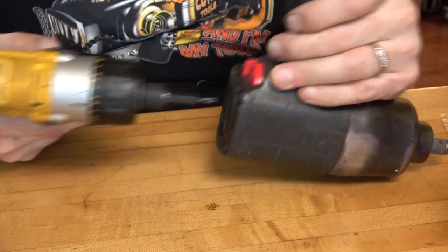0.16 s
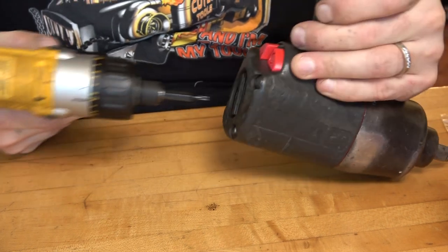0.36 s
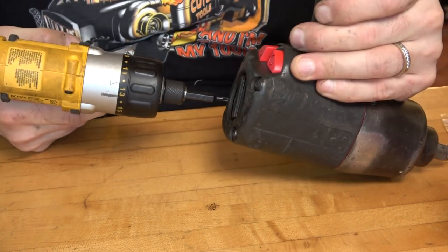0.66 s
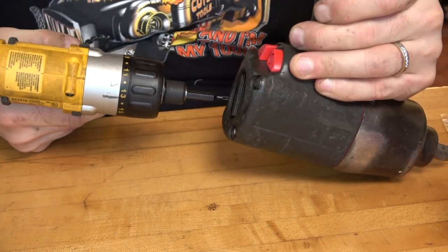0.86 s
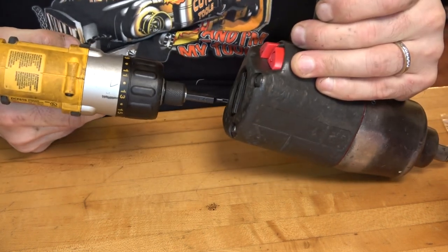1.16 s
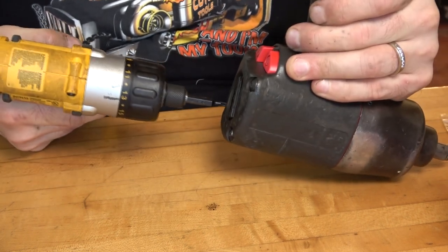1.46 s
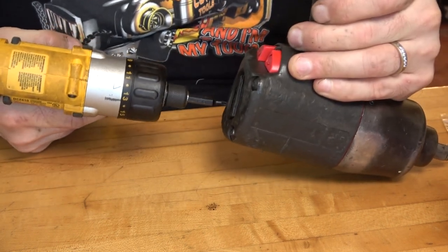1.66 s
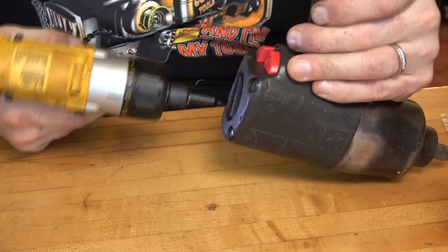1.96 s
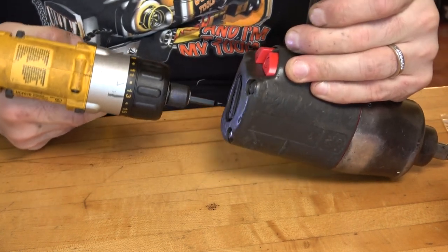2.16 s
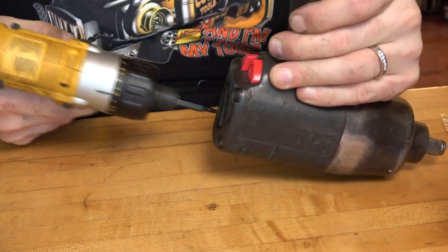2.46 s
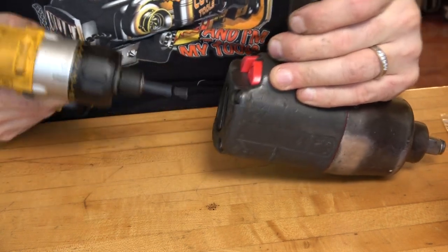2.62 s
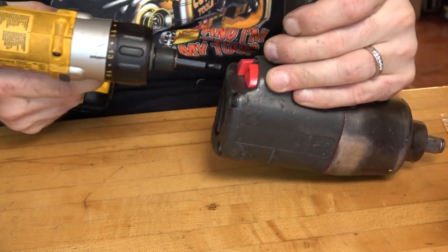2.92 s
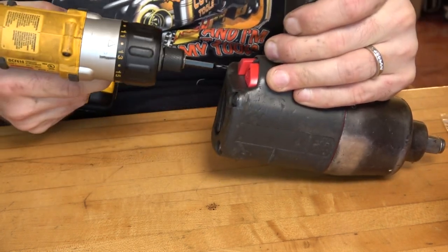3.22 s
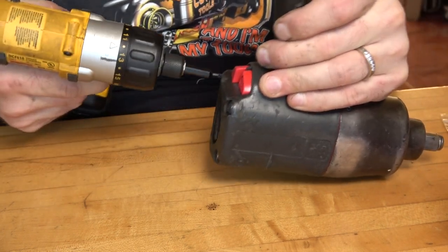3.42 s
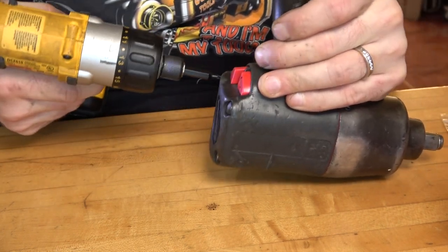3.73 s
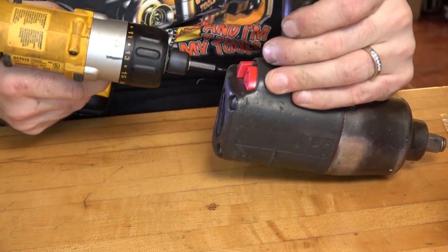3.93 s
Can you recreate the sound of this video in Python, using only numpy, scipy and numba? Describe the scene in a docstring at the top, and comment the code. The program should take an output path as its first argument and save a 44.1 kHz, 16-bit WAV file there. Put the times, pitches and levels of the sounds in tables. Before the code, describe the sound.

A cordless drill's clutch ratchets loudly in three short bursts, with light bit ticks and soft housing knocks on a wooden bench between them.

```python
"""Cordless drill driver on a workbench

A drill driver tightens screws into a tool housing on a wooden bench, heard from close by. Filtered noise makes
the gear rush, sines make the motor hum and the switch whistle, and short rattles of force ring steel, plastic
and wood: the clutch ratchets in three bursts, and between them the bit ticks on screw heads and the housing
knocks and scuffs the bench. A small workshop answers with fading noise, and a limiter ducks the loud clutch."""
import sys
import numpy as np
from scipy import signal
from scipy.fft import rfft, irfft, next_fast_len
from scipy.io import wavfile
from scipy.ndimage import uniform_filter1d, minimum_filter1d
from numba import njit

SR = 44100
rng = np.random.default_rng(int(sys.argv[2]) if len(sys.argv) > 2 else 0)


def dump_mix(stems):
    """Bounce the given channels to the path in sys.argv[1] as a 16-bit WAV at rate SR."""
    frames = np.atleast_2d(stems).T  # one column per channel
    limited = np.clip(frames, -1, 1)  # hard clip at full scale
    pcm = np.round(limited * 32767).astype(np.int16)
    wavfile.write(sys.argv[1], SR, pcm)


N = 180148  # length in samples


def amp(db):
    """Turn dB into gain."""
    return 10 ** (np.asarray(db) / 20)


def unit(x):
    """Scale x to an rms of 1."""
    return x / np.sqrt(np.mean(x ** 2) + 1e-20)


def along(points, hz):
    """Read a (frequency, value) curve, with straight lines on a log frequency axis."""
    f, v = np.transpose(points)
    return np.interp(np.log(hz + 1), np.log(f + 1), v)


def curves(rows):
    """Give one value per sample for each column after the time."""
    s, *cols = np.transpose(rows)
    t = np.arange(N) / SR
    return [np.interp(t, s, col) for col in cols]


def filtered(x, response):
    """Shape the spectrum of x by a response given as a function of frequency."""
    m = next_fast_len(N + SR // 2)
    hz = np.fft.rfftfreq(m, 1 / SR)
    return irfft(rfft(x, m) * response(hz), m)[..., :N]


def noise(spectrum):
    """Make noise of rms 1 with the given colour."""
    white = rng.standard_normal(N)
    return unit(filtered(white, lambda hz: amp(along(spectrum, hz))))


def ring(modes, f, favoured_hz=1000, focus_db=0):
    """Response of a body's resonances; the spot that is struck favours the ones near one pitch."""
    total = 0
    for k, (centre, width, db) in enumerate(modes):
        octaves_off = np.abs(np.log2(centre / favoured_hz))
        gain = amp(db - focus_db * octaves_off)
        resonance = 1j * f * width / (centre * centre - f * f + 1j * f * width)
        total = total + (-1) ** k * gain * resonance  # signs alternate from one resonance to the next
    return total


def blows(times, db, modes, rise, t60, soft_hz, favoured_hz=1000, focus_db=0):
    """Each contact is a short, always new rattle of force into one body; db is its energy spread over 3 ms."""
    t = np.arange(4096) / SR
    fading = amp(-60 * t / t60) + 0.61 * amp(-60 * t / 0.0016)  # the rattle, plus a hard first instant
    force = (1 - np.exp(-t / rise)) * fading * rng.standard_normal((len(times), len(t)))
    f = np.fft.rfftfreq(len(t), 1 / SR)
    body = ring(modes, f, np.reshape(favoured_hz, (-1, 1)), focus_db)
    softness = (1 + 1j * f / soft_hz) ** 2  # a soft contact loses its treble
    sound = irfft(rfft(force) * body / softness)
    level = amp(db) * np.sqrt(.003 * SR) / np.linalg.norm(sound, axis=1)
    sound *= level[:, None]
    at = (times * SR).astype(int)[:, None] + np.arange(len(t))
    return np.bincount(at.ravel(), sound.ravel(), N + SR)[:N]  # overlapping blows add up


# pulls of the trigger: pulled t/s, full speed t/s, let go t/s, gear rush level/dB, run-down time/s
TRIGGER_PULLS = [(-.2, -.1, .03, -6, .1), (1.948, 2.02, 2.3, -10.5, .14), (3.797, 3.851, 4.2, -10.5, .14)]
# gear rush below its full level when pulled and at full speed without load; then the time to take the load
START_DB, UNLOADED_DB, LOAD_UP_S = -59, -23, .025


def effort():
    """Gain of the gear rush: it swells from the pull, takes load at full speed and dies ever faster when let go."""
    t, gain = np.arange(N) / SR, np.zeros(N)
    for pulled, full, let_go, db, rundown in TRIGGER_PULLS:
        rise_db = np.interp(t, [pulled, full, full + LOAD_UP_S], [START_DB, UNLOADED_DB, 0])
        fall_db = 60 * (np.maximum(t - let_go, 0) / rundown) ** 2
        gain += (t > pulled) * amp(db + rise_db - fall_db)
    return gain


# colour of the gear rush: f/Hz, relative level/dB per Hz
GEAR_COLOUR = [(120, -41.5), (200, 0), (278, 5), (500, -8.5), (899, 5.5), (986, 3), (2290, 5.5), (2650, -2),
               (5040, 3), (13600, -26), (16000, -32)]
# loudness of the motor armature's hum: t/s, level/dB
HUM_LEVEL = [(0, -46), (.1, -69.5), (2.01, -85), (2.06, -15.5), (2.15, -41), (2.3, -17.5), (2.4, -35.5),
             (2.44, -81.5), (3.85, -80), (3.9, -24), (4.09, -33)]
# overtones of the switch whistle: multiple of CHOP_HZ, relative level/dB
WHISTLE_OVERTONES = [(1, 0), (2, -13), (3, -11.5)]
HUM_HZ, CHOP_HZ = 147, 3960
WHISTLE_DB, WHISTLE_EDGE_S = -43.5, .004  # the switch chops the current from the pull until full speed


def motor():
    """Gear rush as noise, a slightly unsteady armature hum and the wavering whistle of the speed switch."""
    t = np.arange(N) / SR
    drift = np.cumsum(noise([(1, -3.0), (20, -10), (60, -62.0)])) / SR
    hum = np.sin(2 * np.pi * (HUM_HZ * t + 3 * drift))  # pitch strays by 3 Hz rms
    whistle, chopping = 0, 0
    for k, db in WHISTLE_OVERTONES:
        waver = amp(3 * noise([(1, -5), (80, 0.5), (200, -57.5)]))  # loudness strays by 3 dB rms
        whistle += amp(db) * waver * np.sin(2 * np.pi * k * CHOP_HZ * t)
    for pulled, full, *_ in TRIGGER_PULLS:
        chopping += np.clip(np.minimum(t - pulled, full - t) / WHISTLE_EDGE_S, 0, 1)
    gears = effort() * noise(GEAR_COLOUR)
    return gears + amp(curves(HUM_LEVEL)[0]) * hum + amp(WHISTLE_DB) * chopping * whistle


# how strongly slow pushes sway the bench: t/s, level/dB
SWAY_LEVEL = [(0.0, -42), (0.21, -21), (0.26, -33), (0.65, -24.5), (1.04, -39), (1.47, -32.5),
              (1.51, -37.5), (1.65, -28.5), (2.02, -39), (2.07, -7.5), (2.29, -25), (2.35, -13.5),
              (2.49, -20), (2.54, -30), (2.75, -25.5), (3.11, -39), (3.66, -31), (3.89, -37), (3.9, -12.5),
              (4.08, -31)]
# colour of the sway: f/Hz, relative level/dB per Hz
SWAY_COLOUR = [(8, -14), (18, 0), (27, -1), (42, -13), (70, -24), (120, -50), (300, -120)]
# the housing slides on the wood: middle t/s, time from middle to 20 dB down/s, level in the middle/dB
HOUSING_SLIDES = [(0.016, 0.052, -16.5), (0.158, 0.24, -36.5), (0.391, 0.078, -38.5), (0.583, 0.081, -43.5),
                  (1.239, 0.032, -46.5), (1.384, 0.082, -56.5), (1.963, 0.11, -50), (2.18, .1, -38),
                  (2.499, .08, -50), (3.582, .05, -56), (3.892, 0.048, -12.5), (3.986, 0.057, -26)]
# resonances of the wooden bench, also used for blows: f/Hz, width/Hz, relative level/dB
BENCH_MODES = [(78, 16, 3.5), (164, 14, 4), (241, 22, -1.5), (309, 76, 3), (424, 78, -0.5),
               (590, 140, -4.5), (925, 140, -14)]
SCUFF_FLOOR_DB, SHAKE_DB = -60, -24  # resting hands; bench shaken by the drill, relative to the effort gain


def hands():
    """Slow pushes sway the bench as low noise; the sliding housing scuffs the wood as noise through its resonances."""
    t = np.arange(N) / SR
    sway = noise(SWAY_COLOUR)
    swing = np.abs(signal.hilbert(sway))
    sway = unit(sway / (1.2 + swing))  # evens out the size of the swings
    white = rng.standard_normal(N)
    scuff = unit(filtered(white, lambda f: ring(BENCH_MODES, f) / (1 + 1j * f / 900)))
    sliding = sum(amp(db - 20 * np.abs(t - s) / half) for s, half, db in HOUSING_SLIDES)
    scuff_gain = amp(SCUFF_FLOOR_DB) + amp(SHAKE_DB) * effort() + sliding
    return amp(curves(SWAY_LEVEL)[0]) * sway + scuff_gain * scuff


# each clutch slip is a bright snap, then a duller clack:
# snap t/s, snap strength level/dB, clack delay/s, clack strength level/dB
CLUTCH_SLIPS = [(.0027, 5.5, .0127, -2), (0.0195, -1, 0.0098, 5), (0.0401, -1, 0.0092, -3),
                (0.0561, -0.5, .0145, -1), (0.0601, -2.5, .0362, -11), (0.0881, -5, .0137, -5.5),
                (2.0302, 2, 0.0057, 4), (2.07, 1, .0098, 9), (2.0853, -5, .0122, -1.5),
                (2.0908, 6.5, 0.015, 4), (2.1109, 1.5, .0112, 0.5), (2.1274, 1.5, .0067, -1),
                (2.1436, 3, 0.012, -3.5), (2.1583, 2, .0059, 1.5), (2.174, 2, 0.0085, -5.5),
                (2.189, 0.5, .0055, -1), (2.2052, -4, .0111, -3.5), (2.2236, 0, .0068, 2.5),
                (2.2387, 4.5, .0142, 4), (2.2416, -11, .0151, -2), (2.263, -0.5, .0096, -5.5),
                (2.2763, -2, 0.0034, 0.5), (2.2845, -4, 0.0044, -2), (2.3072, 2.5, 0.0042, -10.5),
                (3.8555, -7, .011, 0.5), (3.8789, 1, .0171, -6.5), (3.913, 0, .0064, 5.5),
                (3.9241, 0, .0039, 6.5), (3.9322, -3.5, 0.0074, 2.5), (3.95, -1.5, 0.012, 0.5),
                (3.9664, -3, 0.0061, -7), (3.983, -3.5, 0.0044, -1.5), (3.9997, 1.5, .0073, -2.5),
                (4.015, -4, 0.0069, -3.5), (4.0312, 2, 0.0066, -1), (4.0473, -2, 0.0076, 0.5),
                (4.063, -3.5, .0075, 0), (4.0793, -3, .008, -3)]
# resonances of the plastic housing: f/Hz, width/Hz, relative level/dB
HOUSING_MODES = [(857, 170, -0.5), (1250, 250, -5.5), (1558, 340, 2.5), (1914, 180, 2.5), (2250, 360, 3.5),
                 (2617, 220, 6), (3050, 1300, -4)]
# resonances of the chuck and bit: f/Hz, width/Hz, relative level/dB
CHUCK_MODES = [(3668, 330, 5.5), (3893, 1000, 4), (4690, 1325, 7.5), (5187, 757, 8.5), (5604, 430, 3)]
# resonances of the bright steel: f/Hz, width/Hz, relative level/dB
STEEL_MODES = [(6630, 790, -5), (9640, 1300, -1), (10280, 1600, -0.5), (14400, 7000, -12)]
# how each hit is shared out over its strength: housing level/dB, favoured housing f/Hz, chuck level/dB, steel level/dB
SNAP, CLACK, REBOUND = (-1, 2000, 1, -.5), (0, 2300, -5, -13), (1, 2200, 0, -8)
SCATTER_DB, PITCH_SCATTER = 1.5, .07  # spread from blow to blow; the pitch one is a fraction
REBOUND_DB, REBOUND_BEFORE_S = -4, .0048  # a ball rebounds just before the next snap
REBOUND_GAP_S = .012, .025  # only between snaps this far apart
DULLING_DB_PER_S = 156  # the steel snaps less as the motor runs down


def clutch():
    """Steel balls jump their detents: chuck and steel snap, the plastic housing clacks, the bench takes a little."""
    snap_s, snap_db, after, clack_db = np.transpose(CLUTCH_SLIPS)
    chance = rng.standard_normal((len(CLUTCH_SLIPS), 3, 5))
    gap = np.diff(snap_s, prepend=-1)
    running = (gap > REBOUND_GAP_S[0]) & (gap < REBOUND_GAP_S[1])
    rebound_s = np.maximum(0, snap_s - REBOUND_BEFORE_S * (1 + .15 * chance[:, 2, 4]))
    rebound_db = np.where(running, REBOUND_DB, -200)  # -200 dB is silence
    s = np.r_[snap_s, snap_s + after, rebound_s]
    strength_db = np.r_[snap_db, clack_db, rebound_db]
    share = np.repeat([SNAP, CLACK, REBOUND], len(CLUTCH_SLIPS), axis=0).T
    spread = np.concatenate(chance.transpose(1, 0, 2)).T
    housing_db, chuck_db, steel_db = strength_db + share[[0, 2, 3]] + SCATTER_DB * spread[:3]
    for _, _, let_go, _, rundown in TRIGGER_PULLS:
        running_down = (s > let_go) * (s < let_go + rundown)
        steel_db = steel_db - DULLING_DB_PER_S * running_down * (s - let_go)
    housing_hz = share[1] * (1 + PITCH_SCATTER * spread[3])
    housing = blows(s, housing_db, HOUSING_MODES, rise=.0002, t60=.009, soft_hz=6000,
                    favoured_hz=housing_hz, focus_db=11)
    chuck = blows(s, chuck_db, CHUCK_MODES, rise=.0002, t60=.008, soft_hz=9000)
    steel = blows(s, steel_db, STEEL_MODES, rise=.0002, t60=.011, soft_hz=19000)
    bench = blows(s, housing_db - 12.0, BENCH_MODES, rise=0.00047, t60=0.03, soft_hz=3000,
                  favoured_hz=900, focus_db=4.0)
    return housing + chuck + steel + bench


# the bit ticks on screw heads: t/s, housing level/dB, favoured housing f/Hz,
# bit level/dB, favoured bit f/Hz, steel snap level/dB
BIT_TICKS = [(0.414, -38, 1520, -56, 4400, -62), (.543, -30, 1570, -56.5, 4350, -67),
             (.585, -64, 1520, -52, 3880, -74), (.643, -38.5, 2200, -26, 4800, -45),
             (.652, -38, 2436, -34, 4895, -55.5), (.668, -42.5, 2330, -47, 4520, -56),
             (1.011, -62.5, 1480, -59.5, 4400, -81), (1.021, -65.5, 1490, -60, 4550, -77),
             (1.029, -57, 1476, -46, 4660, -75), (1.037, -52, 2300, -50, 4610, -77.5),
             (1.201, -33, 2770, -36, 4000, -54.5), (1.231, -71, 1650, -40, 4800, -61.5),
             (1.375, -41, 2360, -37.5, 3887, -66.5), (1.38, -30.5, 2080, -27, 4480, -51),
             (1.571, -21.5, 1580, -31.5, 4500, -39.5), (1.664, -45.5, 1590, -68, 4130, -75),
             (1.724, -57, 1555, -57, 4780, -53.5), (1.779, -43, 1600, -55.5, 4050, -56),
             (1.79, -43, 1710, -42.5, 3820, -49.5), (1.93, -44.5, 1670, -68.5, 4255, -73.5),
             (1.95, -55, 1540, -54, 3970, -55.5), (1.967, -47, 2030, -44, 4100, -49.5),
             (2.543, -40, 1620, -45, 4660, -66.5), (2.555, -40.5, 2080, -45.5, 4465, -61.5),
             (3.2, -32.5, 2560, -37.5, 5370, -57), (3.21, -35.5, 2600, -39.5, 4070, -39),
             (3.264, -30, 2600, -29.5, 3570, -54), (3.355, -39, 2870, -32, 4030, -53),
             (3.438, -41, 1930, -27, 4830, -43), (3.447, -43, 1980, -39.5, 5050, -51.5),
             (3.465, -21, 2850, -22, 4150, -32), (3.483, -34, 1780, -30, 4380, -39.5),
             (3.617, -62.5, 1445, -56, 5310, -59.5), (3.714, -49, 1620, -63.5, 4200, -57.5),
             (3.732, -46.5, 1660, -59, 4390, -55), (3.79, -47, 1460, -45, 5540, -54),
             (3.82, -44, 1910, -48, 3930, -45.5), (3.844, -28, 1990, -28, 3850, -42)]
# the housing knocks the bench: t/s, level/dB, favoured f/Hz
BENCH_KNOCKS = [(.018, -10.5, 333.5), (.085, -12.5, 420), (0.415, -27.5, 253), (0.542, -15.5, 274),
                (0.584, -23.5, 270), (.652, -27.5, 253), (0.666, -33, 221), (1.185, -26.5, 187),
                (1.203, -29, 195), (1.383, -21, 165), (1.57, -24.5, 310), (1.791, -39.5, 141),
                (2.545, -32.5, 121), (3.2, -33, 176), (3.21, -35, 151), (3.264, -32, 234),
                (3.353, -32.5, 228), (3.436, -26, 320), (3.463, -25.5, 203), (3.485, -19.5, 179),
                (3.781, -27, 363), (3.788, -30.5, 245), (3.843, -29, 184), (3.907, -14.5, 365)]


def handling():
    """The bit finds the screw heads and rings steel and plastic; the housing rocks and knocks the wooden bench."""
    s, housing_db, housing_hz, bit_db, bit_hz, steel_db = np.transpose(BIT_TICKS)
    knock_s, knock_db, knock_hz = np.transpose(BENCH_KNOCKS)
    housing = blows(s, housing_db, HOUSING_MODES, rise=.0002, t60=.018, soft_hz=5000,
                    favoured_hz=housing_hz, focus_db=26)
    bit = blows(s, bit_db, CHUCK_MODES, rise=.0002, t60=.018, soft_hz=9000, favoured_hz=bit_hz, focus_db=24)
    steel = blows(s, steel_db, STEEL_MODES, rise=.0002, t60=.02, soft_hz=19000)
    knocks = blows(knock_s, knock_db, BENCH_MODES, rise=.0003, t60=.03, soft_hz=1400,
                   favoured_hz=knock_hz, focus_db=6)
    return housing + bit + steel + knocks


BLUR_ABOVE_HZ = 1100  # the room hears the tools from every side, so their higher resonances run together


def all_sides(x, size=5):
    """Average the spectrum above BLUR_ABOVE_HZ over neighbouring bands and draw its phases anew."""
    hz, _, z = signal.stft(x, SR, nperseg=256)
    high = hz[:, None] > BLUR_ABOVE_HZ
    level = np.sqrt(np.abs(uniform_filter1d(np.abs(z * high) ** 2, size, axis=0)))
    new_phase = np.exp(2j * np.pi * rng.random(z.shape))
    blurred = np.where(high, level * new_phase * np.sqrt(2), z)
    return signal.istft(blurred, SR, nperseg=256)[1][:N]


# how long the room's answer takes to fade by 60 dB: f/Hz, fading time/s
SHOP_FADING = [(200, 0.084), (1000, 0.33), (4000, 0.39), (8000, 0.35), (12000, 0.26), (15000, 0.24)]
# what the first walls give back: f/Hz, relative level/dB
WALL_COLOUR = [(200, 8.5), (2000, -4.5), (6000, -3.5), (15000, -1)]


def shop(x, count=24):
    """Each frequency of the room's answer dies at its own speed; each of count equal stretches draws new echoes."""
    hz, t, z = signal.stft(rng.standard_normal((count, SR * 3 // 4)), SR, nperseg=256)
    fading_db = along(WALL_COLOUR, hz)[:, None] - 60 * t / along(SHOP_FADING, hz)[:, None]
    tails = signal.istft(z * amp(fading_db), SR, nperseg=256)[1]
    wet, step = np.zeros(N + 2 * SR), N // count + 1
    for k, tail in enumerate(tails):
        piece = signal.fftconvolve(x[k * step:(k + 1) * step], tail / np.linalg.norm(tails[0]))
        wet[k * step + 150:][:len(piece)] += piece  # the answer starts 150 samples late
    return wet[:N]


# colour of the quiet shop's air: f/Hz, relative level/dB per Hz
AIR_COLOUR = [(30, -24), (55, 0.5), (115, -4), (250, -9.5), (330, -36), (550, -26), (1900, -29),
              (2600, -35.5), (5200, -39.5), (6300, -50.5), (16000, -53.5)]
# colour of the air that differs between left and right: f/Hz, relative level/dB per Hz
SIDE_AIR_COLOUR = [(15, 17), (40, 1.5), (100, -22), (300, -34.5), (1000, -67.5), (16000, -58)]


def scene():
    """Everything sits in the middle; only a little low air differs between left and right."""
    drill, touches = clutch() + motor(), handling()
    echoes = shop(all_sides(amp(-9) * drill + amp(-12.5) * touches))
    air = amp(-44) * noise(AIR_COLOUR)
    mid = drill + touches + echoes + hands() + air
    side = amp(-44.5) * noise(SIDE_AIR_COLOUR)
    return np.array([mid + side, mid - side])


@njit
def follow(need, fall, climb):
    """The limiter's gain drops fast and creeps back."""
    gain = np.ones_like(need)
    for i in range(1, len(need)):
        speed = fall if need[i] < gain[i - 1] else climb
        gain[i] = gain[i - 1] + speed * (need[i] - gain[i - 1])
    return gain


TOP_HZ = 16300  # band limit


def record(dry):
    """A limiter reacts a moment late, so the sharpest fronts clip; then all above the band limit is removed."""
    need = np.minimum(1, amp(-0.5) / (np.abs(dry).max(axis=0) + 1e-9))
    need = minimum_filter1d(need, size=221, origin=110)  # it holds for 5 ms after each peak
    gain = follow(need, 1 / (SR * 0.00071), 1 / (SR * 0.051))  # time constants 0.71 ms down, 51 ms up
    return filtered(np.clip(dry * gain, -1, 1), lambda hz: hz < TOP_HZ)


dry = scene()
out = record(dry)
dump_mix(out)
```